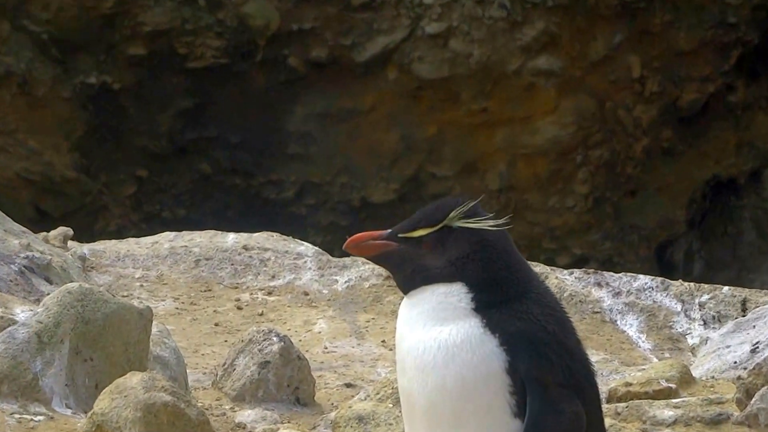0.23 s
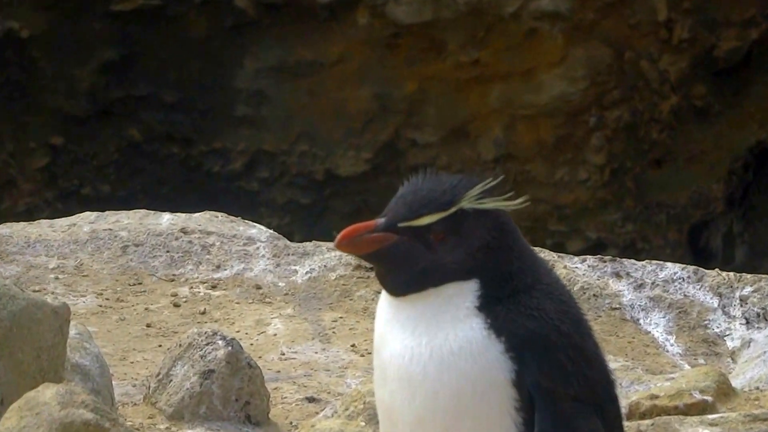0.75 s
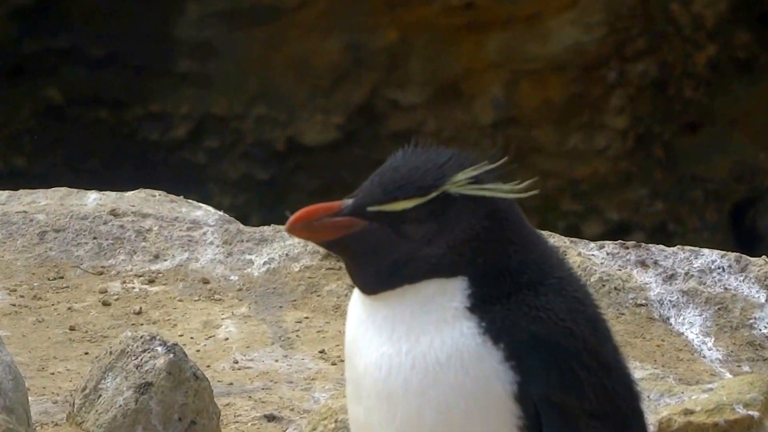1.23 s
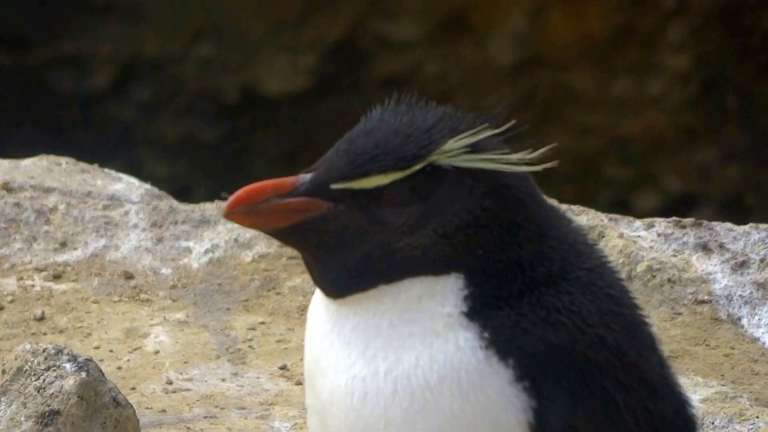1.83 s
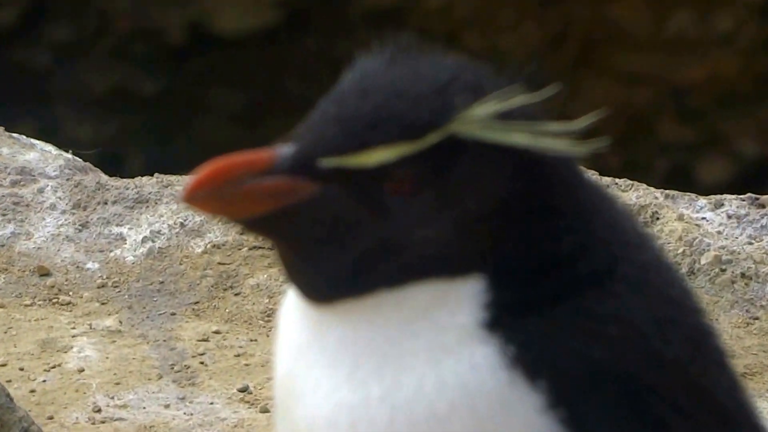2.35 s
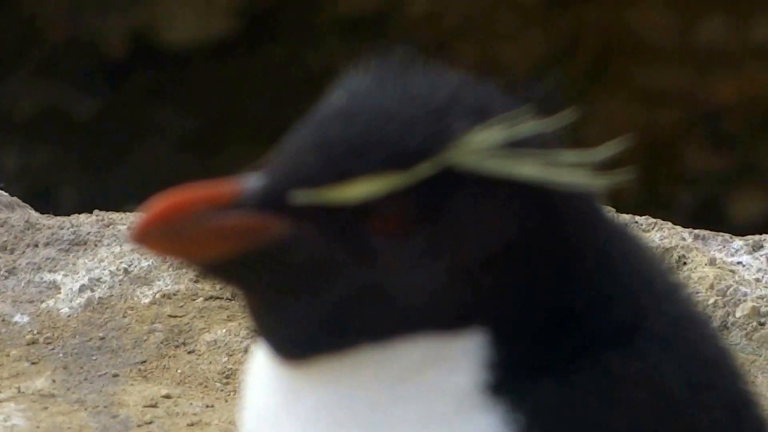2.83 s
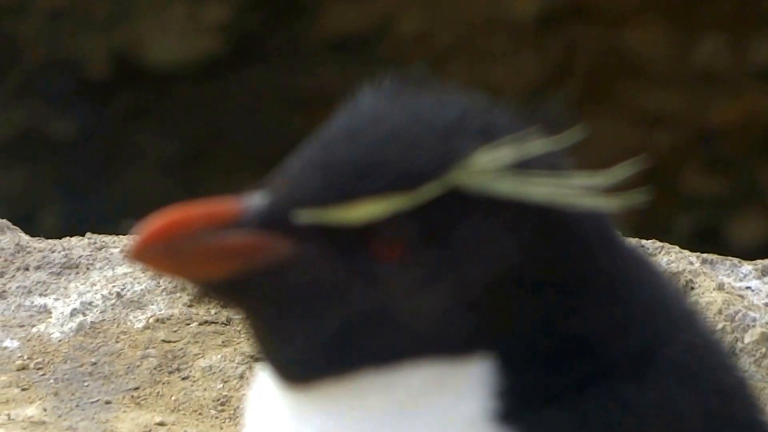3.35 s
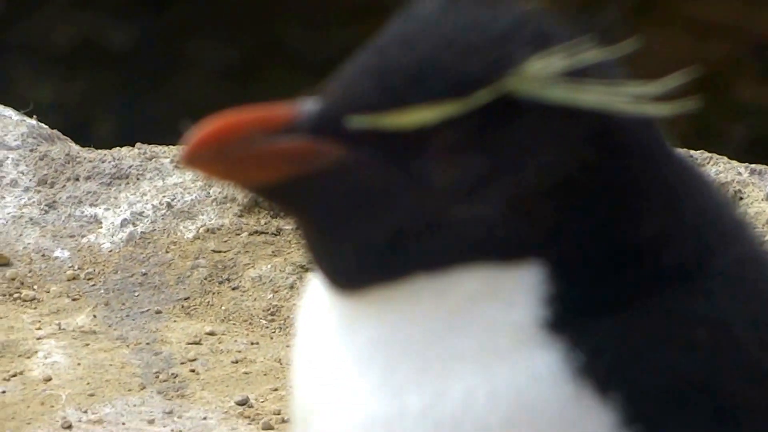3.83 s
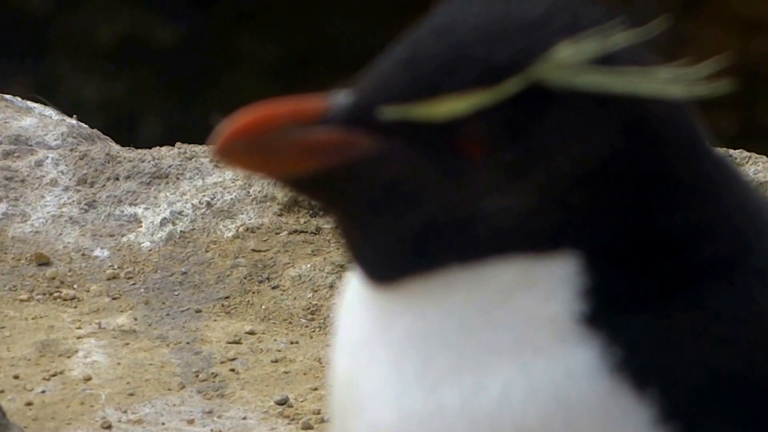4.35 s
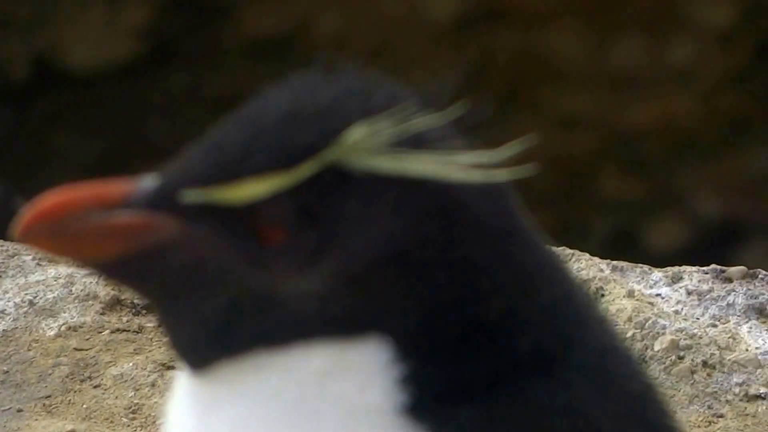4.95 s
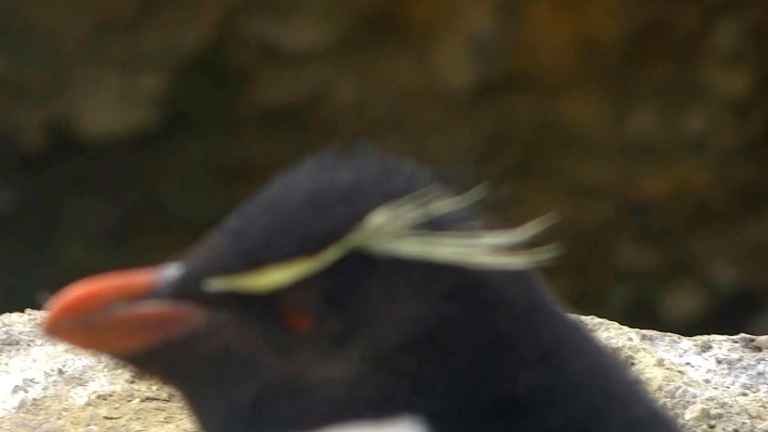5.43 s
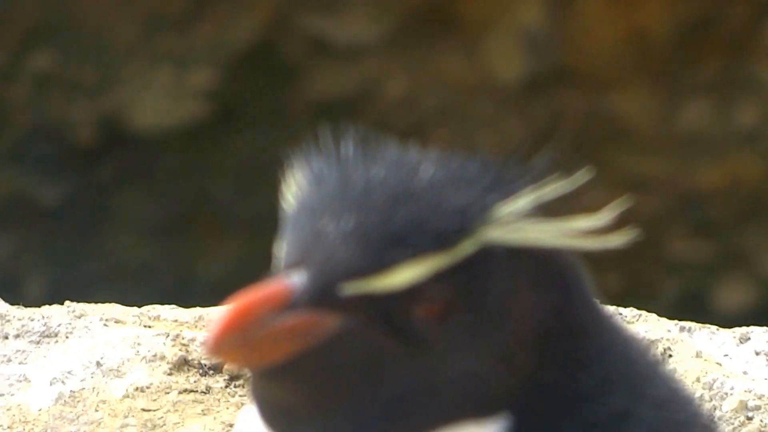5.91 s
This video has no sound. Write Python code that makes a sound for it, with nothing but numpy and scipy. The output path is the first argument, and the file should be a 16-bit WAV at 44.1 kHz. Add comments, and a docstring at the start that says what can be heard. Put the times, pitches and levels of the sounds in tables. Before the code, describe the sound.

A penguin colony on rocky ground: first crowd squawking, scattered hoarse brays and chick whistles, with a wind thump near one and a half seconds. Then a closer penguin calls steadily in clipped, raspy barks that fall in pitch, each with a low grunt. Low wind buffeting grows strongest in the middle, and sharp dry ticks poke through. Short, tight echo from rock, faint camera hiss.

```python
"""Penguin colony under a rock wall

A near adult calls again and again: a grunt and a harsh bark, a falling cry, a low last note, with short rasps between.
Chicks peep in arching whistles, and farther birds bray in hoarse, uneven pulses over a din of squawks and noise.
Gusts of filtered noise buffet the two microphone ports of a camera, which whines and fizzes faintly,
turns its gain down under the rumble and rounds off the peaks. Dry ticks and brief high hisses are scattered on top."""
import sys
import numpy as np
from scipy import signal
from scipy.fft import rfft, irfft, next_fast_len
from scipy.io import wavfile
from scipy.ndimage import uniform_filter1d, map_coordinates

SR = 44100
rng = np.random.default_rng(int(sys.argv[2]) if len(sys.argv) > 2 else 0)


def pcm_store(signal):
    """Save signal as 16-bit PCM."""
    levels = np.round(np.clip(np.atleast_2d(signal), -1, 1) * 32767)
    wavfile.write(sys.argv[1], SR, levels.astype(np.int16).T)


N = 272538

# Levels in the tables are relative: each source adds its own trims or filters.
# Brief high hisses that swell and fade. Each row: start in seconds, length in seconds, level in dB.
HISSES = [(1.04, 0.26, -49.5), (4.96, 0.38, -56)]
# Colour of those hisses. Each row: frequency in Hz, relative density in dB per Hz.
HISS_COLOUR = [(3000, -34), (7000, 8.5), (9500, -10), (11000, -5), (13000, 2), (15000, 0), (16000, -9)]
# Gusts on the ports. Each row: start in seconds, length in seconds, level in dB.
GUSTS = [(.01, 0.093, -48), (0.408, 0.025, -39.5), (.8, 0.83, -51.5), (1.595, 0.035, -13),
         (1.642, 0.016, -16), (1.758, 0.11, -14), (1.9, 0.066, -24), (2.576, 0.0076, -26),
         (2.646, 0.013, -26), (2.744, 0.26, -41.5), (2.98, 0.015, -15), (3.02, 0.027, -26),
         (3.063, 0.15, -41.5), (3.292, 0.013, -12), (3.323, 0.035, -15), (3.358, 0.03, -7),
         (3.429, 0.038, -14.5), (3.466, 0.15, -20.5), (3.635, .03, -15.5), (3.69, .125, -35),
         (3.974, 0.051, -18), (4.015, 0.037, -12), (4.107, 0.034, -20), (4.153, 0.079, -16.5),
         (4.288, 0.012, -15.5), (4.355, 0.01, -28), (4.718, 0.092, -43), (4.839, 0.19, -34.5),
         (5.098, 0.16, -17), (5.277, 0.043, -25), (5.349, 0.095, -26), (5.504, 0.092, -23.5),
         (5.643, 0.011, -25.5), (5.68, 0.072, -45.5), (6.026, 0.13, -31.5)]
# Colour of the gust eddies. Each row: frequency in Hz, relative density in dB per Hz.
BUFFET_COLOUR = [(12, -51), (20, -25), (228, 1), (382, 1.5), (527, -3.5), (725, -8), (999, -17.5),
                 (1400, -25.5), (1820, -93), (3080, -120)]
# Colour of the breeze. Each row: frequency in Hz, relative density in dB per Hz.
AIR_COLOUR = [(20, -23), (80, -1.5), (150, -1), (250, 0.5), (400, -9), (800, -20), (2000, -67)]
# Left-right likeness of the gusts. Each row: frequency in Hz, correlation from -1 to 1.
WIND_LIKENESS = [(30, 0.17), (80, 1), (160, 0.69), (300, -0.057), (600, -0.16)]
# Left-right likeness of the crowd and the breeze. Each row: frequency in Hz, correlation from -1 to 1.
LIKENESS = [(100, 0.66), (400, 1), (1000, 0.79), (2000, 0.92), (5000, 0.91), (8000, 0.88), (13000, .93)]
# Loudness of the crowd over time. Each row: time in seconds, din level in dB, shrillness level in dB.
CROWD = [(0.0, -43, -45.5), (0.79, -40.5, -49), (0.93, -39, -45), (1.53, -37.5, -47), (1.77, -37.5, -44.5),
         (2.38, -37, -45), (3.22, -36.5, -46.5), (3.37, -38, -47), (3.72, -39, -46.5), (4.22, -41, -47),
         (4.42, -37, -43.5), (4.8, -38, -46.5), (5.27, -34, -40), (5.54, -40, -45), (6.04, -38, -46),
         (6.18, -36.5, -34)]
# Colour of the crowd's din. Each row: frequency in Hz, relative density in dB per Hz.
DIN_COLOUR = [(900, -18.5), (1450, -25.5), (1750, 0), (2100, 3), (2450, 2), (2800, 1.5), (3300, -12),
              (4500, -43), (7000, -30.5)]
# Colour of the crowd's shrill edge. Each row: frequency in Hz, relative density in dB per Hz.
SHRILL_COLOUR = [(2300, -32.5), (3400, 3.5), (4600, 3.5), (5500, -5), (7500, -14), (10000, -32),
                 (11800, -62), (15500, -53)]
# Colour of the dull murmur below. Each row: frequency in Hz, relative density in dB per Hz.
MURMUR_COLOUR = [(200, -11.5), (400, -9), (600, 4), (1000, 3.5), (1500, 0), (2500, -43), (5000, -67)]
# Decay of the rock wall's echo. Each row: frequency in Hz, time to fall 60 dB in seconds.
CLIFF_DECAY = [(200, 0.15), (2000, 0.13), (6000, 0.2), (14000, 0.088)]
# Brays of farther birds. Each row: start in seconds, length in seconds, throat resonance in Hz, level in dB.
BRAYS = [(.01, 0.06, 2600, -40), (.23, 0.072, 2460, -38), (.408, 0.11, 2580, -38), (0.475, 0.11, 2054, -40),
         (.777, 0.088, 2550, -35.5), (0.917, .06, 2330, -37), (1.18, 0.13, 2043, -34),
         (1.501, 0.09, 2530, -35), (1.93, 0.071, 2180, -40), (2.13, 0.12, 2320, -37),
         (2.598, 0.064, 2420, -34.5), (2.727, 0.052, 2220, -33), (4.386, 0.057, 2310, -41),
         (5.02, 0.064, 3000, -37), (5.247, 0.2, 2360, -37.5), (5.659, 0.075, 2376, -36),
         (5.795, 0.082, 2490, -38), (6.085, 0.072, 2300, -32)]
# Sharp ticks. Each row: start in seconds, level in dB, level of the knock over the crack in dB.
TICKS = [(1.396, -24, -3), (2.182, -21, 0), (2.6464, -15, 16.5), (2.6665, -5.5, -8), (3.675, -23, -2),
         (5.003, -20, -8)]
# Chick whistles. Each row: start in seconds, rise in seconds, fall in seconds,
# start pitch in Hz, top pitch in Hz, end pitch in Hz, level in dB.
PEEPS = [(.14, 0.047, 0.12, 4420, 4450, 4220, -54), (.74, 0.08, 0.028, 4920, 5200, 5100, -49.5),
         (0.834, .01, 0.061, 5170, 4850, 4020, -43.5), (1.0, 0.061, 0.046, 4380, 4720, 4100, -48.5),
         (1.03, 0.036, 0.075, 3830, 3980, 3670, -52), (1.45, .08, 0.084, 4450, 4570, 4150, -47.5),
         (2.11, 0.079, 0.083, 4280, 4700, 4120, -42.5), (2.3, 0.032, 0.046, 4330, 4580, 4370, -46),
         (2.76, 0.068, .12, 4190, 4930, 4170, -44), (3.205, 0.036, 0.091, 4400, 4680, 4080, -43),
         (3.265, 0.052, 0.049, 4560, 4620, 4070, -38.5), (3.415, .06, 0.15, 3760, 4300, 4110, -41.5),
         (3.7, .04, 0.073, 4280, 4340, 4020, -57), (3.93, 0.087, 0.054, 4610, 4970, 3900, -41.5),
         (4.23, 0.094, .08, 4470, 5000, 4070, -46), (4.64, 0.051, 0.089, 4860, 4950, 3600, -51),
         (4.88, 0.077, 0.065, 4290, 4750, 4500, -47), (4.99, .005, 0.063, 8700, 8550, 8260, -50.5),
         (5.176, .06, 0.082, 4400, 4780, 3980, -38.5), (5.33, 0.026, .09, 4300, 4180, 4030, -53),
         (5.53, 0.078, .05, 4070, 4550, 4150, -46.5), (5.635, .04, .045, 4150, 4200, 3650, -43.5),
         (5.835, .015, 0.059, 4800, 4800, 4330, -45.5), (5.865, 0.073, 0.07, 4350, 4460, 4300, -40.5)]
# Calls of the near adult. Each row: bark start in seconds, grunt level in dB, bark length in seconds,
# bark pitch in Hz, bark level in dB, cry delay in seconds, cry length in seconds, cry start pitch in Hz,
# cry end pitch in Hz, cry roughness from 0 to 1, cry level in dB, last note level in dB.
ADULT_CALLS = [(2.378, -29, 0.012, 2480, -26.5, 0.011, 0.02, 1640, 1470, 0.1, -33.5, -30.5),
               (2.770, -24.5, 0.0092, 2970, -23.5, 0.028, .028, 2003, 1606, 0.4, -21, -54),
               (3.174, -20.5, 0.014, 2740, -27, .042, 0.032, 2313, 1617, 0.07, -22.5, -53),
               (3.57, -19, 0.022, 2850, -24, 0.014, 0.029, 2146, 1700, 0.46, -22, -36),
               (3.938, -18, 0.027, 2800, -25, .021, 0.037, 1924, 1820, .33, -21.5, -47),
               (4.287, -21.5, 0.026, 2496, -27, .029, .014, 1820, 1510, 0.74, -27.5, -35.5),
               (4.606, -21, 0.024, 2950, -28.5, .018, 0.034, 1852, 1590, 0.31, -25, -32.5),
               (4.919, -19.5, .011, 2960, -24.5, 0.0065, 0.033, 1776, 1726, 0.33, -26, -38.5),
               (5.214, -25, .022, 2870, -25.5, .024, 0.015, 1966, 1740, 1, -33, -50),
               (5.433, -24, 0.021, 2510, -29.5, 0.016, 0.013, 1767, 1380, 0.46, -30, -50),
               (5.497, -40, .004, 2530, -28, 0.00101, .021, 1820, 1697, .15, -23, -52),
               (5.783, -26, .012, 2540, -27.5, 0.013, 0.0065, 3720, 3590, 0.18, -25, -48)]
# Short rasps between the calls. Each row: start in seconds, length in seconds, level in dB, grunt level in dB.
RASPS = [(1.52, 0.0098, -33.5, -38), (2.28, 0.0123, -32, -28.5), (2.826, 0.0223, -27, -23.5),
         (3.14, 0.0155, -30.5, -40), (3.19, 0.024, -27, -45), (3.253, .017, -31, -49),
         (3.436, 0.0063, -28, -34), (3.536, 0.013, -28, -35), (3.807, .008, -36, -23),
         (3.831, .023, -27.5, -27), (3.907, 0.019, -27, -29), (3.991, 0.018, -25, -27),
         (4.188, 0.0096, -29, -32), (4.243, .014, -28.5, -24), (4.51, .035, -36.5, -23),
         (4.566, .013, -33.5, -50), (4.831, 0.028, -33.5, -21), (5.178, .01, -27, -36),
         (5.731, 0.024, -30.5, -33), (5.987, .024, -28, -47), (6.048, 0.016, -30, -34)]
# The adult's throat as a filter. Each row: frequency in Hz, gain in dB.
THROAT = [(300, -14), (800, -10), (1100, 8), (1500, -6.5), (2100, 2.5), (2600, -3), (3200, 1.5),
          (4200, -2.5), (5000, -1), (6000, -6.5), (7500, -8.5), (10000, -18.5), (12000, -30), (15000, -38)]

# gusts: long ones linger, so the release grows by this share of the length
GUST_ATTACK_S, GUST_RELEASE_S, GUST_LINGER = 0.0041, 0.0082, 0.047
# the breeze in a calm; the stirred air after a gust, and how fast it settles
CALM_DB, WAKE_DB, WAKE_S = -57, -14.5, 0.05
DIN_TRIM_DB, SHRILL_TRIM_DB = -1.5, -3
PEEP_RISE_BEND, PEEP_FALL_BEND = 1.6, 1.5  # powers of the two sides of the arch
GRUNT_LEAD_S = 0.00576  # the chest sounds just before the bark
BARK_SAG, BARK_ROUGH = .87, 0.637  # end pitch over start pitch; roughness 0-1
# a shrill edge on each bark; dB over the bark
SQUEAK_HZ, SQUEAK_END_HZ, SQUEAK_DB, SQUEAK_DELAY_S = 4980, 4450, -11, 0.0026
# the low note that a cry breaks down into
LAST_HZ, LAST_END_HZ, LAST_S, LAST_ROUGH = 1221, 1002, 0.021, 1
RASP_HZ, RASP_END_HZ, RASP_ROUGH = 2172, 2017, 0.85
# gain control: threshold, strength, top of the rumble band, averaging, lag
DUCK_DB, DUCK_SLOPE, DUCK_HZ, DUCK_S, DUCK_LAG_S = -18.5, 0.45, 463, 0.021, 0.015
CEILING, TOP_HZ = .56, 15850  # the camera's peak amplitude and band limit


def amp(db):
    """Decibels to gain."""
    return 10 ** (np.asarray(db) / 20)


def unit(x):
    """x at rms 1."""
    return x / np.sqrt(np.mean(x ** 2) + 1e-20)


def along(points, hz):
    """Read (Hz, value) points on a log frequency axis."""
    f, v = np.transpose(points)
    return np.interp(np.log(hz + 1), np.log(f + 1), v)


def curves(rows):
    """One value per sample for each column after the time."""
    s, *cols = np.transpose(rows)
    return [np.interp(np.arange(N) / SR, s, c) for c in cols]


def wobble(rate, size=N):
    """A smooth random curve, rate knots a second."""
    knots = rng.standard_normal(int(size * rate / SR) + 4)
    return map_coordinates(knots, [np.arange(size) * rate / SR], mode="mirror")


def filtered(x, response):
    """x times a response of frequency."""
    m = next_fast_len(N + 8192)
    return irfft(rfft(x, m) * response(np.fft.rfftfreq(m, 1 / SR)), m)[..., :N]


def coloured(x, spectrum):
    """x through (Hz, dB) points."""
    return filtered(x, lambda hz: amp(along(spectrum, hz)))


def spread(pair, likeness):
    """Two unrelated signals become left and right with a given likeness, at rms 1."""
    def mid_side(hz):
        turn = np.arccos(np.clip(along(likeness, hz), -1, 1)) / 2
        return np.array([np.cos(turn), np.sin(turn)])

    mid, side = filtered(pair, mid_side)
    return unit(np.array([mid + side, mid - side]))


def panned(x, left_db):
    """Place x in stereo with the left side louder by left_db."""
    return x * amp([[left_db / 2], [-left_db / 2]])


def add(track, s, sound):
    """Mix a sound into a track at time s."""
    part = track[max(round(s * SR), 0):][:len(sound)]
    part += sound[:len(part)]


def gate(t, length, attack, release):
    """Opens at t = 0 and dies away after length."""
    return (1 - np.exp(-t / attack)) * np.exp(-np.maximum(t - length, 0) / release)


def squawk(length, start_hz, end_hz, rough, buzz_hz=450, buzz=1.78, jitter=0.086, lurch=.06,
           overtone_db=-13, fall_db=-5, rasp_db=-11, slip=0.79):
    """One note: a whistling membrane, shaken by a slower second one that adds side bands and rasp."""
    t = np.arange(int((length + .015) * SR)) / SR
    glide = start_hz + (end_hz - start_hz) * np.minimum(t / length, 1) ** 1.554
    shake = jitter * rough * wobble(1400, len(t)) + lurch * rough * wobble(170, len(t))
    phase = 2 * np.pi * np.cumsum(glide * (1 + shake)) / SR
    slow = 2 * np.pi * np.cumsum(buzz_hz * (1 + 0.25 * rough * wobble(386, len(t)))) / SR
    # the overtones waver and come and go from one instant to the next
    flutter, waver = 5 * wobble(220, len(t)), slip * wobble(700, len(t))
    tone = np.sin(phase)
    for k in range(3):
        tone += amp(overtone_db + fall_db * k + flutter) * np.sin((k + 2) * phase + (k + 1) * waver)
    rasp = amp(rasp_db) * rough * rng.standard_normal(len(t))
    beat = np.exp(rough * (buzz * np.cos(slow) + .4 * wobble(300, len(t))))
    return unit((tone + rasp) * beat) * gate(t, length, attack=0.00047, release=0.0032)


def cliff(x):
    """The rock wall scatters the calls back as a noise tail whose decay time varies with frequency."""
    hz, t, z = signal.stft(rng.standard_normal((2, SR // 2)), SR, nperseg=256)
    decay = amp(-60 * t / along(CLIFF_DECAY, hz)[:, None])
    tail = signal.istft(z * decay, SR, nperseg=256)[1]
    # the echo sets in after 5.8 ms
    tail = np.pad(tail / np.linalg.norm(tail[0]), ((0, 0), (int(0.0058 * SR), 0)))
    return signal.fftconvolve(x[None], tail, axes=1)[:, :N]


def camera_noise():
    """The camera's own steady fizz of high noise and a thin, slightly unsteady whine."""
    t = np.arange(N) / SR
    fizz = unit(coloured(rng.standard_normal(N), [(6000, -12), (11500, -10), (12800, 5), (15500, 9)]))
    whine = np.sin(2 * np.pi * 15625 * t + .6 * wobble(60))
    return amp(-84) * fizz + amp(-70) * whine


def hisses():
    """Brief high hisses: coloured noise under smooth rounded swells."""
    t = np.arange(N) / SR
    hiss = unit(coloured(rng.standard_normal(N), HISS_COLOUR))
    swell = np.zeros(N)
    for s, length, db in HISSES:
        swell += amp(db) * np.sin(np.pi * np.clip((t - s) / length, 0, 1)) ** 2
    return swell * hiss


def wind(lump_db=4.4, bright_db=-31):
    """Eddies thump each port; weak gusts are duller than strong ones, and each leaves stirred air behind."""
    push = np.zeros(N)
    for s, length, db in GUSTS:
        t = np.arange(int((2 * length + .05) * SR)) / SR
        add(push, s, amp(db) * gate(t, length, GUST_ATTACK_S, GUST_RELEASE_S + GUST_LINGER * length))
    eddies = spread(coloured(rng.standard_normal((2, N)), BUFFET_COLOUR), WIND_LIKENESS)
    # level the eddies over about 10 ms, so the push and its lumps set their strength
    eddies = eddies / np.sqrt(np.abs(uniform_filter1d(np.mean(eddies ** 2, axis=0), size=450)) + 1e-6)
    dull = unit(filtered(eddies, lambda hz: 1 / (1 + (hz / 520) ** 4)))
    # 0 is all dull, up to bright_db; 1 is all bright
    force = np.clip(np.log10(push / amp(bright_db) + 1e-6) * 1.53, 0, 1)
    lumps = unit(amp(lump_db * np.minimum(wobble(110), 1)))
    puffs = push * lumps * (force * eddies + (1 - force) * dull)
    air = spread(coloured(rng.standard_normal((2, N)), AIR_COLOUR), LIKENESS)
    settle = 1 / (WAKE_S * SR)
    wake = signal.lfilter([settle], [1, settle - 1], push)
    breeze = amp(CALM_DB) + amp(WAKE_DB) * wake
    return puffs + breeze * unit(air * amp(2.95 * wobble(30)))


def chorus(count, centre_hz=2200):
    """Very many far birds, each giving a short rough squawk at its own pitch."""
    out = np.zeros(N)
    for k, (when, long, high, loud) in enumerate(rng.random((count, 4))):
        pitch = centre_hz * 2 ** (1.3 * (high - .5))
        note = squawk(.015 + .03 * long, pitch, .98 * pitch, rough=.35)
        add(out, (k + when) / count * N / SR, amp(-5 * loud) * note)
    return unit(out)


def colony(blur=2.37, murmur_db=-6):
    """Far squawks, smeared by the rocks and blurred with noise, merge into a din over a duller murmur."""
    din_db, shrill_db = curves(CROWD)
    voices = unit(cliff(chorus(count=900))) + blur * rng.standard_normal((2, N))
    voices = spread(voices, LIKENESS)
    din = amp(din_db + DIN_TRIM_DB + 2.55 * wobble(23.93)) * unit(coloured(voices, DIN_COLOUR))
    shrill = amp(shrill_db + SHRILL_TRIM_DB + 1.26 * wobble(18)) * unit(coloured(voices, SHRILL_COLOUR))
    murmur = amp(din_db + murmur_db) * unit(coloured(voices, MURMUR_COLOUR))
    return panned(din + shrill + murmur, left_db=1)


def brays(pulse_hz=105, width=0.18, upper=1.315, upper_db=-9):
    """Hoarse brays: uneven pulses of air ring two throat resonances."""
    out = np.zeros(N)
    for s, length, throat_hz, db in BRAYS:
        t = np.arange(int((length + 0.065) * SR)) / SR
        pulses = np.exp(.5 * np.cos(2 * np.pi * pulse_hz * t + 1.5 * wobble(80, len(t))))
        hz = np.fft.rfftfreq(len(t), 1 / SR)

        def ring(f):
            damping = 1j * hz * width * 2 * f
            return (damping / (f * f - hz * hz + damping)) ** 2

        throat = ring(throat_hz) + amp(upper_db) * ring(upper * throat_hz)
        cry = irfft(rfft(pulses * rng.standard_normal(len(t))) * throat, len(t))
        # a wavering tone sits on the lower resonance
        pitch = throat_hz * (1 + 0.0567 * wobble(299.5, len(t)))
        tone = pulses * np.sin(2 * np.pi * np.cumsum(pitch) / SR)
        bray = unit(cry) + amp(-8.5) * unit(tone)
        add(out, s, amp(db + 0.5) * bray * gate(t, length, attack=0.0092, release=0.01))
    return out


def ticks():
    """Dry ticks: a bright crack of noise and a short hard knock, a tone that dies within milliseconds."""
    out, t = np.zeros(N), np.arange(SR // 50) / SR
    for s, db, body_db in TICKS:
        crack = rng.standard_normal(len(t)) * gate(t, 0.00074, attack=0.00062, release=0.00094)
        knock = np.sin(2 * np.pi * 2100 * t) * amp(-60 * t / 0.0067)
        add(out, s, amp(db - 12.5) * crack + amp(db + body_db - 13.5) * knock)
    return out


def chicks(second_db=-21, quaver=0.0025, drift=0.0026, gain_db=4, shape=0.36, crescendo_db=3):
    """Thin whistles that climb to a top and fall, growing louder, with a weak, unsteady octave."""
    out = np.zeros(N)
    for s, rise_s, fall_s, start_hz, top_hz, end_hz, level_db in PEEPS:
        t = np.arange(int((rise_s + fall_s) * SR)) / SR
        u = t / (rise_s + fall_s)
        before = np.maximum(rise_s - t, 0) / rise_s
        after = np.maximum(t - rise_s, 0) / fall_s
        climb = (top_hz - start_hz) * before ** PEEP_RISE_BEND
        drop = (top_hz - end_hz) * after ** PEEP_FALL_BEND
        arch = top_hz - climb - drop
        unsteady = 1 + quaver * wobble(377, len(u)) + drift * wobble(35, len(u))
        phase = 2 * np.pi * np.cumsum(arch * unsteady) / SR
        swell = np.abs(np.sin(np.pi * u)) ** shape
        db = level_db + crescendo_db * (u - .5) + 3.1 * wobble(61, len(u))
        # the chick's throat favours the octave of its lower notes
        octave = amp(second_db + 3.4 * wobble(83, len(u))) * (4500 / arch) ** 6 * np.sin(2 * phase)
        add(out, s, amp(db + gain_db) * swell * (np.sin(phase) + octave))
    return out


def grunt(db):
    """A short low pulse from the chest: four harmonics of an unsteady low pitch."""
    t = np.arange(SR // 20) / SR
    phase = 2 * np.pi * np.cumsum(280 * (1 + 0.213 * wobble(277, len(t)))) / SR
    tone = sum(amp(-4.5 * k) * np.sin((k + 1) * phase + rng.uniform(0, 2 * np.pi)) for k in range(4))
    return amp(db - 6) * tone * gate(t, 0.0058, attack=0.002, release=0.013)


def adult():
    """Bark, cry and last note follow in turn; they and the rasps pass the throat, with grunts from the chest."""
    voice, chest = np.zeros(N), np.zeros(N)
    for (s, grunt_db, bark_s, bark_hz, bark_db, delay, cry_s,
         cry_hz, end_hz, rough, cry_db, last_db) in ADULT_CALLS:
        bark = squawk(bark_s, bark_hz, BARK_SAG * bark_hz, BARK_ROUGH)
        squeak = squawk(bark_s, SQUEAK_HZ, SQUEAK_END_HZ, BARK_ROUGH)
        cry = squawk(cry_s, cry_hz, end_hz, np.clip(rough, 0, 1))
        last = squawk(LAST_S, LAST_HZ, LAST_END_HZ, LAST_ROUGH)
        add(chest, s - GRUNT_LEAD_S, grunt(grunt_db))
        add(voice, s, amp(bark_db) * bark)
        add(voice, s + SQUEAK_DELAY_S, amp(bark_db + SQUEAK_DB) * squeak)
        add(voice, s + delay, amp(cry_db) * cry)
        add(voice, s + delay + cry_s, amp(last_db) * last)
    for s, length, db, grunt_db in RASPS:
        add(chest, s, grunt(grunt_db))
        add(voice, s, amp(db) * squawk(length, RASP_HZ, RASP_END_HZ, RASP_ROUGH))
    return amp(.5) * coloured(voice, THROAT) + chest


def scene():
    """Adult and chicks to the left, brays in the centre, the crowd and the wind all round."""
    near, young, far = adult(), chicks(), brays()
    birds = panned(near, left_db=5) + panned(young, left_db=6.5) + panned(far, left_db=0)
    echo = cliff(amp(-11) * near + amp(-20) * young + amp(-13) * far)
    return birds + echo + colony() + wind() + ticks() + hisses() + camera_noise()


def record(dry):
    """The camera turns its gain down under rumble, rounds off the highest peaks and cuts at its band limit."""
    def rumble_band(hz):
        lag = np.exp(-2j * np.pi * hz * DUCK_LAG_S)
        return lag / (1 + (hz / DUCK_HZ) ** 4)

    rumble = filtered(dry, rumble_band)
    power = np.abs(uniform_filter1d(np.mean(rumble ** 2, axis=0), size=int(DUCK_S * SR)))
    ducked = dry * (1 + power / amp(DUCK_DB) ** 2) ** -DUCK_SLOPE
    rounded = ducked / (1 + (ducked / CEILING) ** 4) ** .25
    return filtered(rounded, lambda hz: hz < TOP_HZ)


dry = scene()
out = record(dry)
pcm_store(out)
```